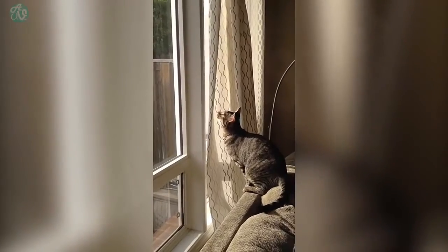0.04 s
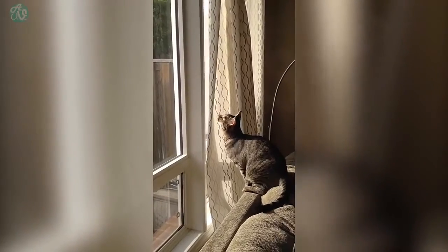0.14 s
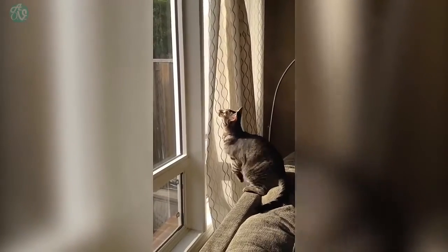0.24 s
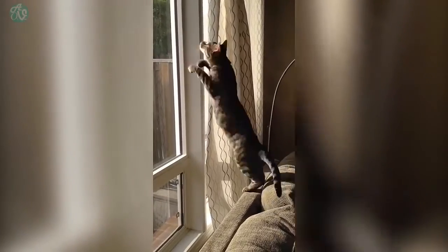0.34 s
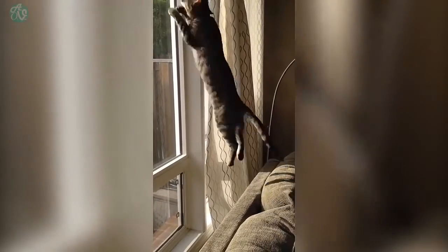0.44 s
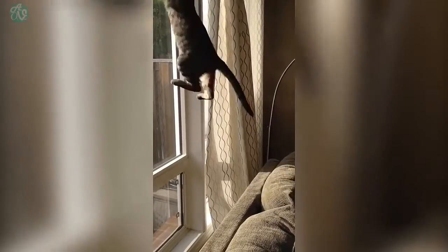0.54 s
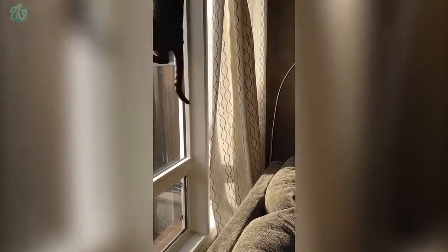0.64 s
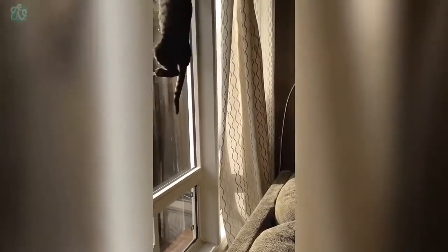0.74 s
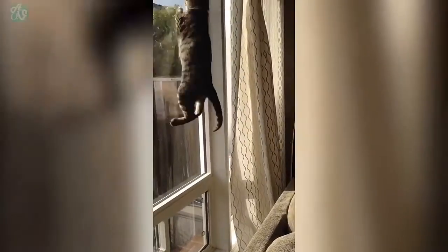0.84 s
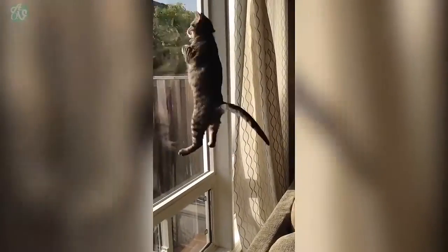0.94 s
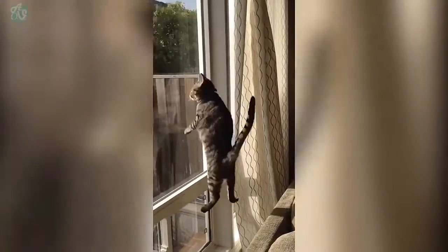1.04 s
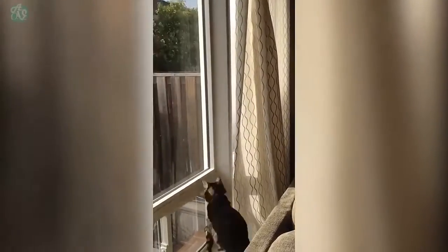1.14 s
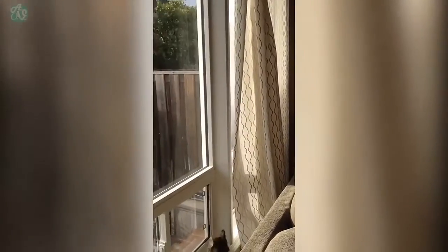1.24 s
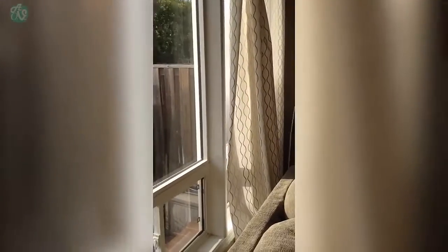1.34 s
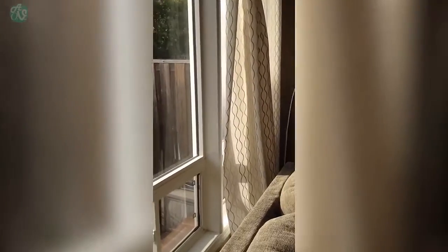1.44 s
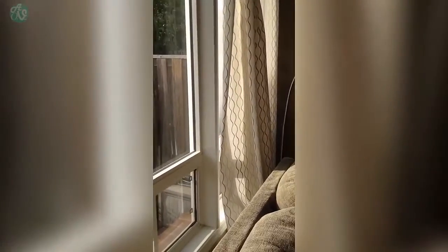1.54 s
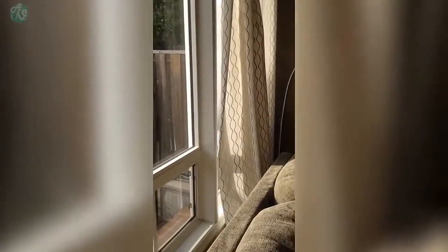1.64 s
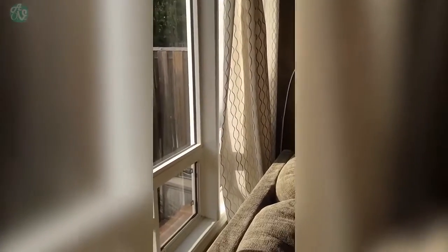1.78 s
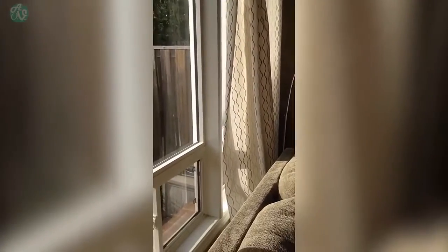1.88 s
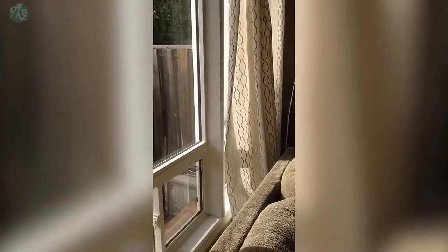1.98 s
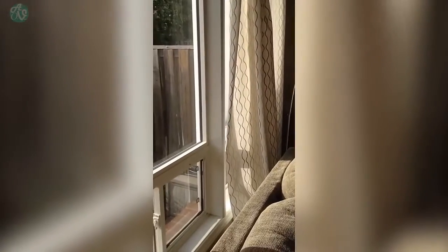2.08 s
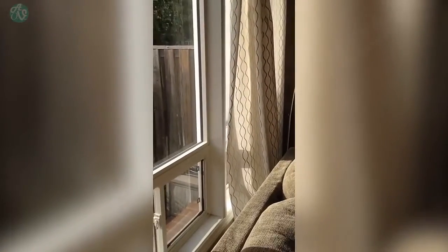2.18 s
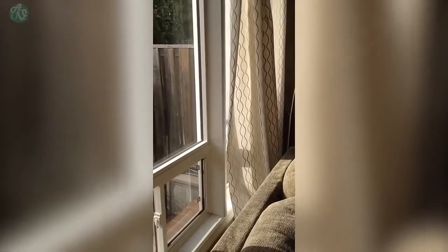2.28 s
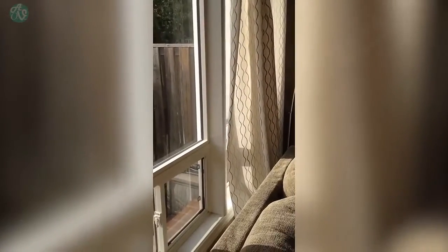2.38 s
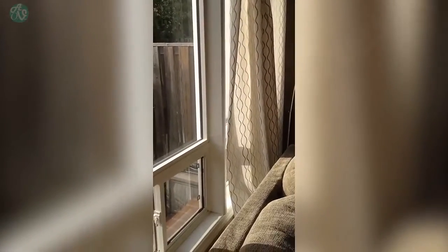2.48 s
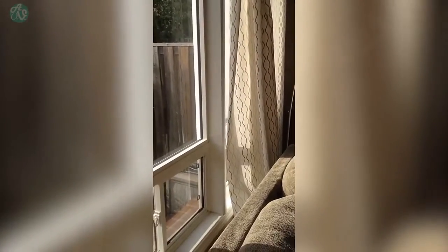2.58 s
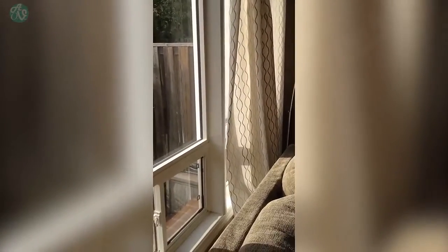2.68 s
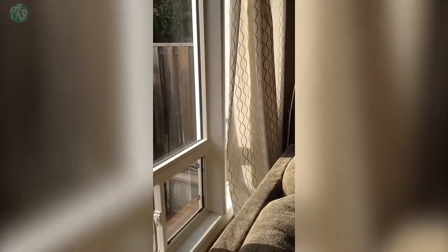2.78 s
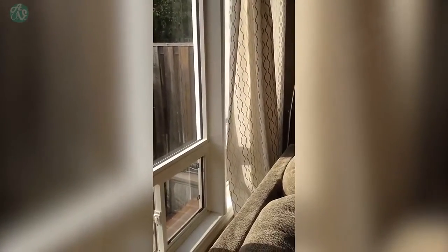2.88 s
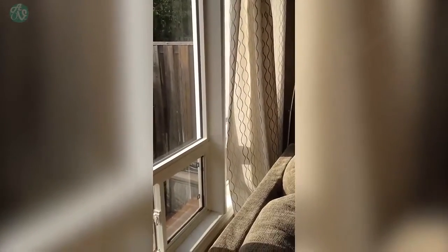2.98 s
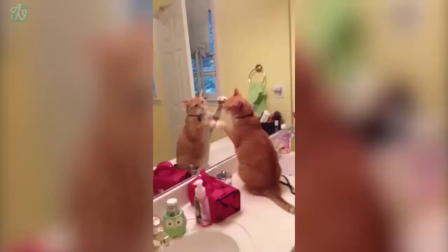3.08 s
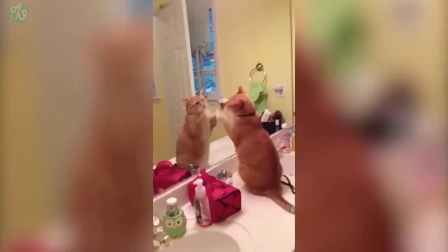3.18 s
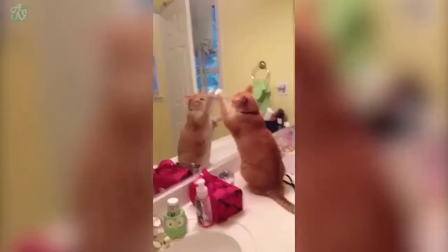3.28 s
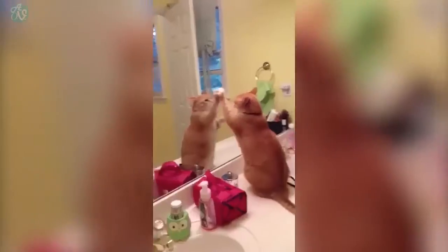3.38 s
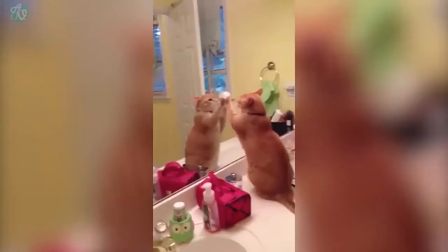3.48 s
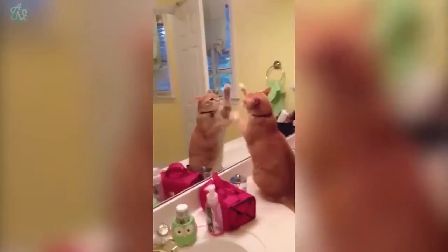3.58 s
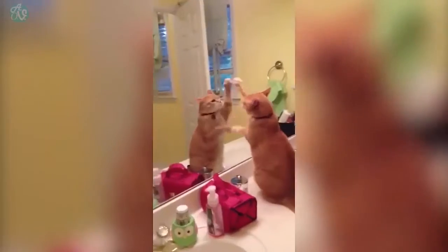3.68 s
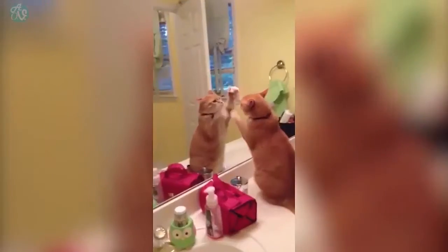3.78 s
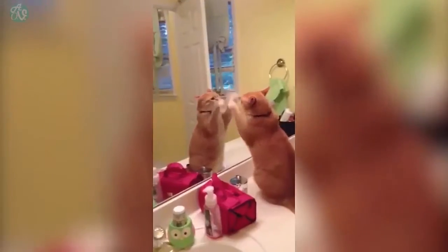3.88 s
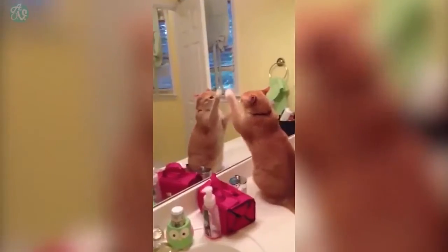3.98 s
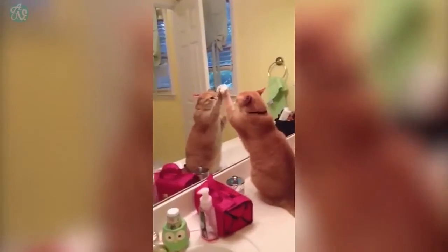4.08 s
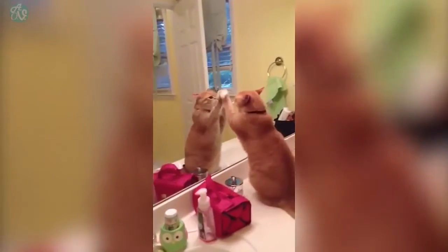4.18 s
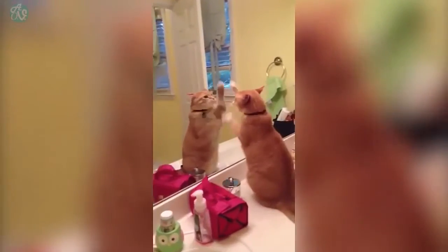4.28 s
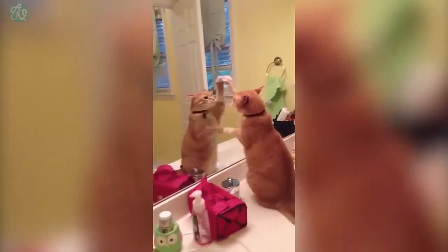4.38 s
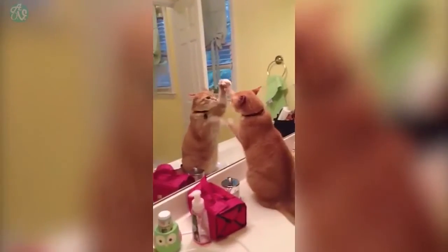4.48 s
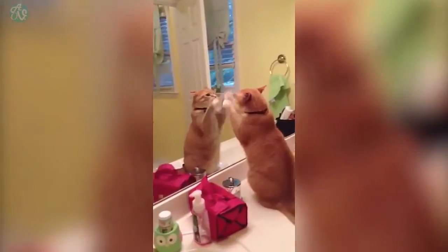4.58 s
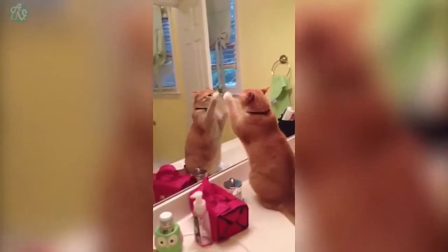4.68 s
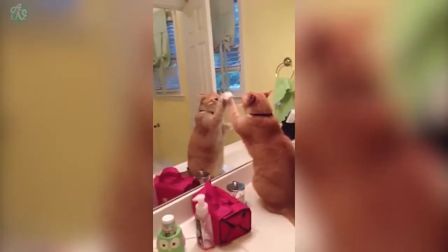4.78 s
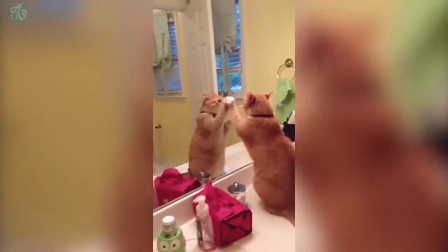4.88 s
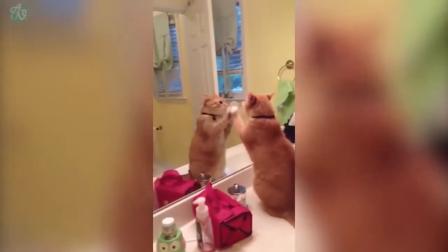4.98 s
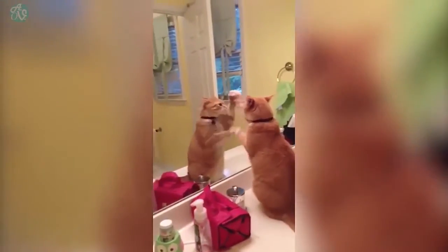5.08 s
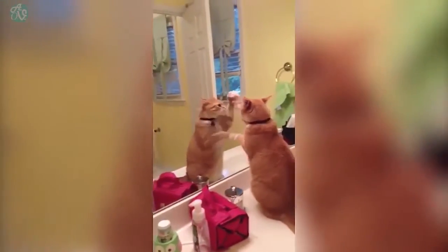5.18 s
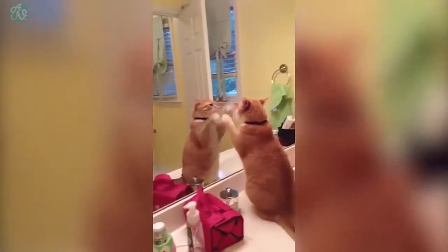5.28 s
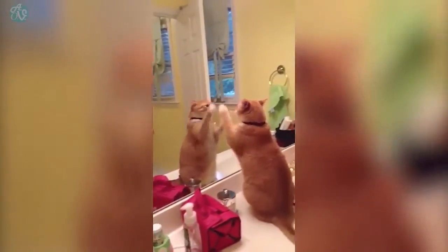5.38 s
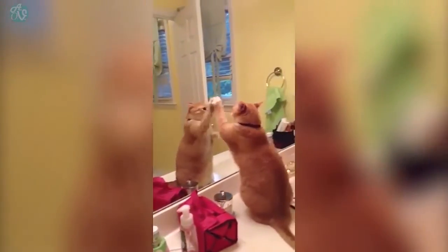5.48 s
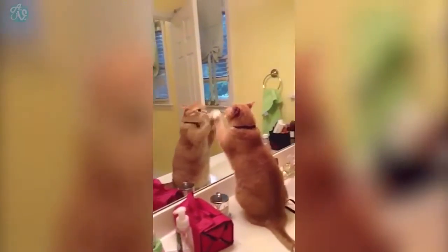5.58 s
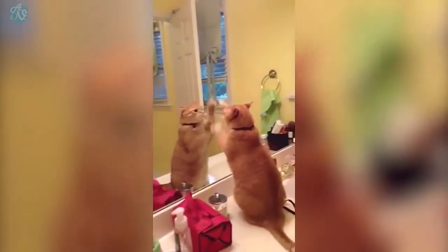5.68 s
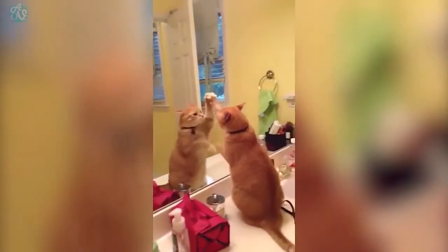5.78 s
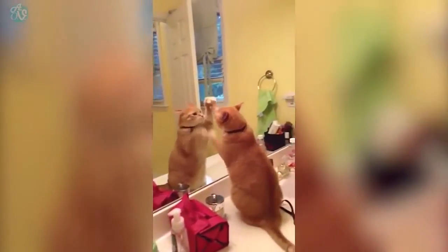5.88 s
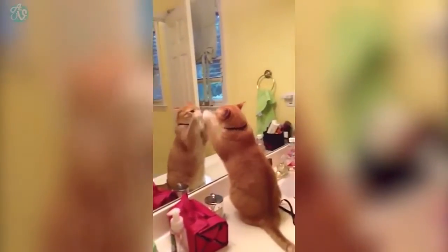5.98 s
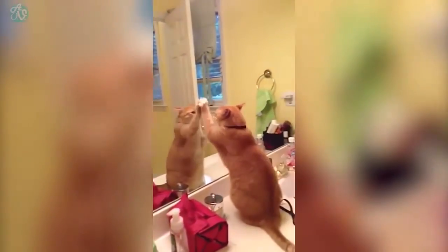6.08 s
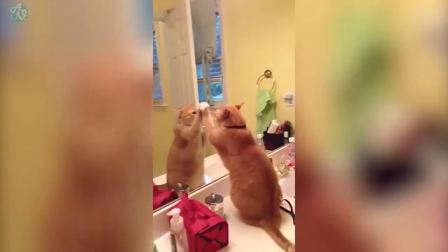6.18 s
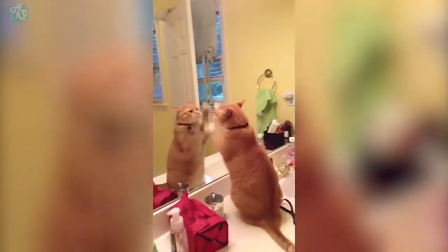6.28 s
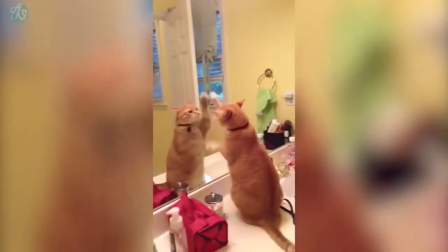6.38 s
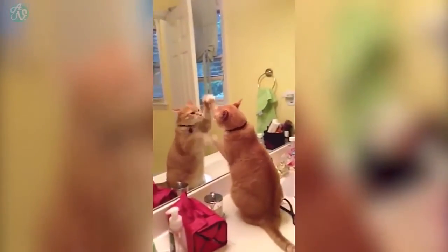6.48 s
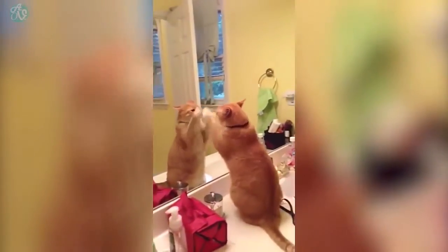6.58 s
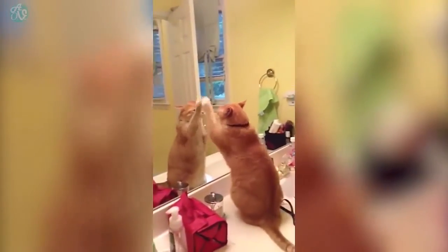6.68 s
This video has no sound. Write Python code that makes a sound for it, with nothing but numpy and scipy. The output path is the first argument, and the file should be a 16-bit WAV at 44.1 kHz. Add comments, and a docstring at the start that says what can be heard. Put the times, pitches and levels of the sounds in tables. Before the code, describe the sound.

A cat's collar bell jingles as it bangs a window and thuds down; after a click, paws slap a bathroom mirror about three times a second.

```python
"""Bell jingles, window bangs, claw scrapes and two thuds: a cat leaps at a living-room window and lands.
After a short break of two soft clicks, a pop and thin hiss, a cat in a small bathroom paws at a mirror
about three times a second: slaps, judders, swishes and one hollow bump. Hits are damped sine modes plus
coloured noise dying at the room's rate; judders are trains of soft pushes; fur and air are shaped noise.
"""
import sys
import numpy as np
from scipy import signal
from scipy.fft import rfft, irfft, next_fast_len
from scipy.io import wavfile
from scipy.ndimage import uniform_filter1d

SR = 44100
rng = np.random.default_rng(int(sys.argv[2]) if len(sys.argv) > 2 else 0)


def store_pcm(level_fs):
    """Save levels as 16-bit WAV."""
    pcm = np.round(np.clip(level_fs, -1, 1) * 32767).astype(np.int16)
    wavfile.write(sys.argv[1], SR, np.atleast_2d(pcm).T)


N = 297234
TIME_S = np.arange(N) / SR
AGE_S = TIME_S[:SR * 3 // 4]  # time since a contact

# Event levels are nominal: each layer adds its own trim. Spectra and modes are relative, rescaled to rms 1.

# Air of the living room. Each row: frequency in Hz, density in dB per Hz.
LOUNGE_AIR = [(24, -91), (40, -62), (91, -34), (166, -11), (202, -22), (218, -13), (241, -4), (325, -21.5),
              (350, -15.5), (377, -23.5), (417, -23), (817, -31), (926, -26), (1050, -33.5), (15500, -57)]
# A distant fan. Each row: centre in Hz, width in Hz, level in dB.
FAN_HUM = [(240.4, 5.3, -59), (173, 16, -73), (942, 120, -74)]
# Decay of the living room. Each row: frequency in Hz, t60 in seconds.
LOUNGE_T60 = [(200, 0.56), (1000, 0.48), (4000, 0.56), (12000, 0.56)]

# Jolts of the bell's pellet. Each row: start in seconds, level in dB, thinnest ring relative to it in dB.
JINGLES = [(0.7103, -60, -8), (0.8056, -40.5, -16), (0.8395, -35, -11), (0.9344, -44, -18),
           (0.967, -43, -8), (1.0675, -30, -13), (1.2989, -58, -3), (1.3758, -50, -6), (1.4416, -38.5, -6),
           (1.502, -35.5, -5), (1.575, -38, -12), (1.601, -44, 6), (1.6324, -47, -1), (1.9101, -56, -19),
           (1.9815, -48, -21)]
# The bell's lowest, middle and thinnest partials. Each row: frequency in Hz, level in dB, t60 in seconds.
BELL_LOW = [(6386, 3, 0.43), (6310, 4, 0.2), (6500, -1, .25)]
BELL_MIDDLE = [(8400, -13, .3), (8940, -2.5, 0.13), (8850, -15, 0.28), (12350, -14, 0.16), (12330, 3, 0.15),
               (12700, 12, 0.14), (12840, 2, 0.094), (12800, -10, .24), (13050, -8, .16)]
BELL_HIGH = [(10810, -13, 0.21), (11000, -7, 0.13), (14500, -4, .21), (15100, -3, 0.086), (14980, -6, .14)]
# Dense response of the bell's shell. Each row: frequency in Hz, density in dB per Hz.
BELL_SHELL = [(4000, -20.5), (5000, -18.0), (7500, -17.5), (8900, -13.5), (10000, -21),
              (11800, -13), (12750, -0.5), (13700, -25), (14800, -16), (15600, -25)]

# Paws and body hitting the window. Each row: start in seconds, boom in dB, knock in dB.
WINDOW_BUMPS = [(0.784, -32, -24), (0.84, -25, -25), (0.867, -25.5, -34), (0.914, -27.5, -34.5),
                (0.936, -29.5, -31.5), (0.963, -34, -44)]
# Claws catching and scraping. Each row: start in seconds, level in dB.
CLAWS = [(0.7837, -39), (0.839, -27.5), (0.8664, -44.5), (0.9987, -50.5), (1.0867, -35), (1.478, -33),
         (1.496, -29)]
# The window in its frame. Each row: frequency in Hz, level in dB, t60 in seconds.
WINDOW_FRAME = [(165.5, -5, 0.23), (227.6, -0.5, 0.43), (315, 8.5, 0.43), (402, -1, 0.48),
                (444, -4.5, 0.24), (509, -6, 0.51), (578, -6.5, 0.36), (739, -9, 0.18), (797, -16, 0.21)]
# Boom, knock, fur scuff and claw scrape. Each row: frequency in Hz, density in dB per Hz.
BOOM = [(53, -63), (90, -34), (119, -18.5), (226, 0.5), (270, -2), (339, -4.5), (415, -16), (450, -23),
        (580, -51.5), (990, -120)]
KNOCK = [(220, -21), (380, -3.5), (448, -2.5), (542, -17.5), (746, -6), (835, -11.5), (875, -15),
         (1300, -23.5), (1690, -41.5), (2860, -120)]
SCUFF = [(710, -36), (1200, 1.5), (1430, -1.5), (1980, -3.5), (2140, -4.5), (3060, -8.5), (4580, -10),
         (7780, -23), (12000, -22), (15600, -45), (22000, -120)]
SCRAPE = [(880, -28), (1500, -2.5), (2120, -15), (4410, 0.5), (5200, -5), (6610, -0.5), (11500, -16.5),
          (12600, -14), (15000, -23)]

# Paws landing. Each row: start in seconds, boom in dB, knock in dB, scuff in dB, lead-in in seconds.
LANDINGS = [(1.435, -15, -23.5, -32, 0.0038), (1.5, -13, -15.5, -22.5, 0.028)]
# Floorboards. Each row: frequency in Hz, level in dB, t60 in seconds.
FLOOR = [(179.3, -12.5, 0.38), (229, 2.5, 0.18), (334.6, -10.5, 0.31), (374.5, 1, 0.082), (438, -13, 0.19),
         (535, -16, 0.36), (677, -11, 0.15), (982, -18.5, 0.11)]
# Knock of a landing. Each row: frequency in Hz, density in dB per Hz.
THUD = [(250, -24), (420, -5), (471, -1), (594, -7.5), (663, 0.5), (780, -9.5), (871, -8.5), (1200, -17.5),
        (1560, -50), (2640, -120)]

# Two soft, short clicks in the break. Each row: start in seconds, end in seconds, level in dB.
CLICKS = [(3.209, 3.233, -50.5), (3.276, 3.289, -53.5)]
# A dull pop in the break. One row: start in seconds, end in seconds, level in dB.
POP = (3.231, 3.242, -45)
# The clicks, then a thin hiss with a faint 2.2 kHz whistle. Each row: frequency in Hz, density in dB per Hz.
CLICK = [(88, -36), (150, 2.5), (312, -23), (485, 1.5), (1240, -18), (1690, -7), (2620, -21.5), (4800, -10),
         (7050, -33), (12000, -38), (15600, -71), (22000, -120)]
BREAK_HISS = [(300, -6), (1900, -9), (2120, -4), (2190, 16), (2260, -6), (4000, -8), (6000, -16),
              (15000, -24)]

# Air of the bathroom. Each row: frequency in Hz, density in dB per Hz.
BATH_AIR = [(24, -54), (40, -40), (101, -16), (166, 2), (253, -2.5), (325, 0), (496, -12.5), (740, -9.5),
            (903, -12), (1160, -12), (1310, -12), (10900, -21), (15500, -26)]
# Decay of the bathroom. Each row: frequency in Hz, t60 in seconds.
BATHROOM_T60 = [(300, 0.43), (1000, 0.24), (2500, 0.19), (6000, 0.19), (13000, 0.16)]

# Paws slapping the mirror. Each row: start in seconds, slap in dB, weight behind it in dB,
# snap of a flat landing in dB, slap centre in Hz.
TAPS = [(3.565, -34, -62, -40, 2400), (3.927, -22.5, -30.5, -32, 1860), (4.238, -29, -37.5, -30, 2730),
        (4.587, -29.5, -36, -24, 2070), (4.952, -26.5, -41, -25.5, 2205), (5.296, -30, -39.5, -38, 2300),
        (5.666, -22.5, -35.5, -30.5, 2315), (5.959, -30.5, -47.5, -45, 1890),
        (6.287, -25.5, -39.5, -28, 2420), (6.622, -25, -41, -28, 2050)]
# Pad's slap, snap, claw tick and glass knock. Each row: frequency in Hz, density in dB per Hz.
SLAP = [(710, -31), (1200, -7), (1370, -3.5), (1890, -1.5), (2020, -0.5), (2210, 1), (2710, -3), (3060, -4),
        (3850, -1), (5500, -32), (7150, -51), (12100, -120)]
SNAP = [(2000, -52), (3200, 4), (3800, 4), (4700, 5.0), (5300, -12.5), (6200, -40)]
TICK = [(2820, -7), (4800, -1.5), (5370, 2), (5990, -7), (7210, -6.5), (10300, -11.5), (14900, -19),
        (15500, -17)]
GLASS_KNOCK = [(200, -21), (340, -2), (378, -8.5), (500, 3), (556, -11), (660, 10), (756, 2), (817, 8.5),
               (882, 2), (1400, 0.5), (1820, -50), (3080, -120)]
# Glass damped by its mounting, then the mirror flexing. Each row: frequency in Hz, level in dB, t60 in seconds.
PANE = [(690, -7.5, 0.44), (755, 2.5, 0.18), (1122, -1.5, 0.26), (1573, -1.5, 0.17), (2035, 13, 0.13),
        (2120, 11.5, 0.11), (2400, 8, 0.15), (2700, 0, 0.12), (3050, 11, 0.14), (3296, 11, 0.12),
        (3540, -16, .15), (3950, 3, 0.14), (4280, 5.5, 0.16), (4860, -6, 0.15), (7100, -11.5, 0.099)]
PANEL = [(148.6, -1.5, .16), (184.7, -6.5, 0.3), (216.1, 4, 0.19), (249, -6.5, 0.18), (320, -14.5, 0.19)]

# Pads sticking and slipping. Each row: start in seconds, end in seconds, level in dB, panel pitch in Hz.
SLIDES = [(3.658, 3.942, -44, 206.5), (4.135, 4.26, -43, 200), (4.76, 4.898, -56, 206),
          (5.3, 5.454, -44, 184.4), (5.51, 5.678, -43.5, 177), (5.855, 6.0, -47, 176),
          (6.16, 6.275, -54, 193), (6.38, 6.6, -52.5, 185)]
# Soft drag of a sliding pad. Each row: frequency in Hz, density in dB per Hz.
PAD_DRAG = [(70, -55), (140, -1.0), (210, 3), (270, -15), (420, -43.0), (900, -56)]

# Strokes of fur. Each row: fastest moment in seconds, level in dB, rise in seconds, fall in seconds.
STROKES = [(3.835, -49, .1, .035), (4.1, -47.5, 0.034, 0.089), (4.495, -42.5, .065, 0.048),
           (4.81, -48, 0.11, 0.22), (5.255, -49, .038, .06), (5.6, -49, 0.12, 0.11),
           (5.865, -42.5, .045, 0.055), (6.181, -46.5, 0.069, .11), (6.511, -42.5, 0.083, 0.049)]
# One longer, brighter rub of fur. One row: start in seconds, end in seconds, level in dB.
BRUSH = (5.62, 5.81, -55.5)
# Fur hiss, plain and bright. Each row: frequency in Hz, density in dB per Hz.
FUR = [(320, -49), (550, -12.5), (658, -2.5), (953, -7.5), (1040, 1), (1220, -8), (1270, -3.5), (1980, -8),
       (2490, -8), (6000, -32.5), (7800, -62), (13200, -120)]
BRIGHT_FUR = [(1000, -30), (2500, -7.0), (3700, -3.5), (5000, -3), (5800, -15), (9000, -19), (15000, -26)]

# One dull, hollow bump. Each row: frequency in Hz, level in dB, t60 in seconds.
HOLLOW = [(202, -7.5, 0.18), (288, -5, 0.17), (306.3, 5, 0.074), (351, -15, 0.12)]

LOUNGE_DB, BREAK_DB, BATH_DB = -57, -78, -57.5
LOW_RING_DB, LOW_RING_GROWTH = -36, 0.55  # at a 0 dB jolt; dB gained per dB of jolt
SCUFF_DB = -23  # re nominal knock
TICK_DB, TICK_FROM_SNAP = -6.5, 0.39  # re nominal slap; share of snap-minus-slap added
CLAW_HZ, CLAW_SPREAD_OCTAVES = 7490, 0.14  # tick resonance and its spread from tap to tap
STROKE_SHAPE = 1.41  # 1 = pointed swell, 2 = rounded
SLOW_HZ, FAST_HZ = 1450, 2040  # hiss centre, paw nearly still and at full speed
BRUSH_FADE_S, LIFT_S = 0.11, 0.05  # LIFT_S: a stroke dies this quickly once the next slap lands
HOLLOW_S, HOLLOW_DB = 4.4865, -21.5
TOP_HZ = 15500


def amp(db):
    """Decibels to gain."""
    return 10 ** (np.asarray(db) / 20)


def unit(x):
    """Scale to rms 1."""
    return x / np.sqrt(np.mean(x ** 2) + 1e-20)


def struck(x):
    """Scale a hit to rms 1 over its first 25 ms."""
    return x / np.sqrt(np.mean(x[:SR // 40] ** 2) + 1e-20)


def along(points, hz):
    """Read (Hz, value) points on a log-frequency axis."""
    f, v = np.transpose(points)
    return np.interp(np.log(hz + 1), np.log(f + 1), v)


def filtered(x, response):
    """Multiply the spectrum of x by a response of frequency."""
    size = next_fast_len(len(x) + 8192)
    spectrum = rfft(x, size) * response(np.fft.rfftfreq(size, 1 / SR))
    return irfft(spectrum, size)[:len(x)]


def noise(spectrum, size):
    """Coloured noise of rms 1."""
    return unit(filtered(rng.standard_normal(size), lambda hz: amp(along(spectrum, hz))))


def gate(start_s, end_s, fade_s):
    """1 between two times, with sloping edges outside them."""
    return np.clip(1 + np.minimum(TIME_S - start_s, end_s - TIME_S) / fade_s, 0, 1)


def add(track, s, sound):
    """Mix a sound into the track at time s."""
    part = track[round(s * SR):][:len(sound)]
    part += sound[:len(part)]


def burst(spectrum, room_t60, direct_db, direct_t60_s, attack_s):
    """Dense contact noise: a room tail dying band by band, plus a direct part that dies faster still."""
    hz, t, z = signal.stft(noise(spectrum, len(AGE_S)), SR, nperseg=256)
    # near walls comb the treble differently for each contact
    comb_db = 3 * unit(uniform_filter1d(rng.standard_normal(len(hz)), 2)) * np.clip(hz / 2500, 0, 1)
    decay_db = -60 * t / along(room_t60, hz)[:, None]
    tail = signal.istft(z * amp(comb_db[:, None] + decay_db), SR, nperseg=256)[1][:len(AGE_S)]
    direct = amp(direct_db) * np.exp(-np.log(1000) * AGE_S / direct_t60_s)
    return struck(tail * (1 + direct) * (1 - np.exp(-AGE_S / attack_s)))


def ring(modes, attack_s, scatter_db, detune):
    """Damped sine modes, their strengths and pitches scattered at random for each blow."""
    hz, db, t60_s = np.transpose(modes)[:, :, None]
    level, pitch = rng.standard_normal((2, len(modes), 1))
    waves = amp(db + scatter_db * level) * np.sin(2 * np.pi * hz * (1 + detune * pitch) * AGE_S)
    decaying = np.sum(waves * np.exp(-np.log(1000) * AGE_S / t60_s), 0)
    return struck(decaying * (1 - np.exp(-AGE_S / attack_s)))


def living_room_air():
    """Steady coloured noise and a distant fan's hum: noise through narrow resonances."""
    air = amp(LOUNGE_DB) * noise(LOUNGE_AIR, N)
    for centre_hz, width_hz, db in FAN_HUM:
        hum = filtered(rng.standard_normal(N), lambda hz: 1 / (1 + (2 * (hz - centre_hz) / width_hz) ** 2))
        air += amp(db) * unit(hum)
    return air * gate(0, 3.165, fade_s=0.0025)


def collar_bell(bounces_hz=70, bounce_db=-8, rise_s=0.0019):
    """A loose pellet strikes a small slotted shell and bounces twice, ringing close pairs of partials."""
    out = np.zeros(N)
    for s, db, thin_db in JINGLES:
        low_db = LOW_RING_DB + LOW_RING_GROWTH * db
        add(out, s, amp(low_db) * ring(BELL_LOW, rise_s, scatter_db=10, detune=0.00034))
        add(out, s, amp(db - 9.5) * burst(BELL_SHELL, LOUNGE_T60, 18.5, direct_t60_s=0.04, attack_s=rise_s))
        delays_s = np.append(0, np.cumsum(rng.uniform(0.5, 1.5, size=2) / bounces_hz))
        for k, late_s in enumerate(delays_s):
            hit_db = db + k * bounce_db
            middle = ring(BELL_MIDDLE, rise_s / 2, scatter_db=10, detune=0.004)
            high = ring(BELL_HIGH, rise_s / 2, scatter_db=2, detune=0.004)
            add(out, s + late_s, amp(hit_db - 9.0) * middle)
            add(out, s + late_s, amp(hit_db + thin_db - 7.5) * high)
    return out


def leap():
    """Blows boom in the window frame; claws scrape during the blows, after them and around the landings."""
    out = np.zeros(N)
    for s, boom_db, knock_db in WINDOW_BUMPS:
        frame = ring(WINDOW_FRAME, attack_s=0.0016, scatter_db=4.0, detune=0.0147)
        boom = burst(BOOM, LOUNGE_T60, direct_db=-7, direct_t60_s=0.16, attack_s=0.0035)
        knock = burst(KNOCK, LOUNGE_T60, direct_db=-12.0, direct_t60_s=0.082, attack_s=0.002)
        scuff = burst(SCUFF, LOUNGE_T60, direct_db=10.0, direct_t60_s=0.04, attack_s=0.00053)
        add(out, s, amp(boom_db - 5.5) * frame)
        add(out, s, amp(boom_db - 9.5) * boom)
        add(out, s, amp(knock_db - 8.0) * knock)
        add(out, s, amp(knock_db + SCUFF_DB) * scuff)
    for s, scrape_db in CLAWS:
        scrape = burst(SCRAPE, LOUNGE_T60, direct_db=13, direct_t60_s=0.051, attack_s=0.00073)
        add(out, s, amp(scrape_db - 7.0) * scrape)
    return out


def landing():
    """Pads brush the floor first; then the cat's weight drops on the boards, which boom."""
    out = np.zeros(N)
    for s, boom_db, knock_db, scuff_db, lead_s in LANDINGS:
        brush = noise(SCUFF, len(AGE_S)) * np.exp(-AGE_S[::-1] / lead_s)  # swells up to the impact
        boards = ring(FLOOR, attack_s=0.005, scatter_db=0, detune=0.0045)
        boom = burst(BOOM, LOUNGE_T60, direct_db=-0.5, direct_t60_s=0.087, attack_s=0.004)
        knock = burst(THUD, LOUNGE_T60, direct_db=8, direct_t60_s=0.076, attack_s=0.0029)
        scuff = burst(SCUFF, LOUNGE_T60, direct_db=11.5, direct_t60_s=0.073, attack_s=0.0022)
        add(out, s - AGE_S[-1], amp(scuff_db - 11.0) * brush)
        add(out, s, amp(boom_db - 2.5) * boards)
        add(out, s, amp(boom_db - 8.0) * boom)
        add(out, s, amp(knock_db - 5.5) * knock)
        add(out, s, amp(scuff_db - 5.5) * scuff)
    return out


def break_sounds():
    """Two short noise bursts heard as soft clicks, one flat pulse heard as a pop, and a thin hiss."""
    levels = sum(amp(db) * gate(start_s, end_s, fade_s=0.001) for start_s, end_s, db in CLICKS)
    clicks = noise(CLICK, N) * levels
    pop_start_s, pop_end_s, pop_db = POP
    pop = amp(pop_db) * gate(pop_start_s, pop_end_s, fade_s=0.00025)
    hiss = amp(BREAK_DB) * noise(BREAK_HISS, N) * gate(3.21, 3.315, fade_s=0.005)
    return clicks + pop + hiss


def bathroom_air():
    """A steady hiss of coloured noise under the bathroom."""
    return amp(BATH_DB) * noise(BATH_AIR, N) * gate(3.315, N / SR, fade_s=0.0016)


def paw_taps():
    """Claws tick, the pad slaps, the glass rings briefly and the whole panel flexes a moment later."""
    out = np.zeros(N)
    for s, slap_db, weight_db, snap_db, centre_hz in TAPS:
        # the pad's shape as it lands favours one part of the slap's range
        pad = [(hz, db - 5 * np.log2(hz / centre_hz) ** 2) for hz, db in SLAP]
        slap = burst(pad, BATHROOM_T60, direct_db=-14, direct_t60_s=0.021, attack_s=0.00049)
        add(out, s, amp(slap_db - 5.5) * slap)
        # a flat, fast landing adds a brighter snap
        snap = burst(SNAP, BATHROOM_T60, direct_db=-5, direct_t60_s=0.02, attack_s=0.0003)
        add(out, s, amp(snap_db - 12.5) * snap)
        # each spot rings the glass modes at different strengths
        glass = ring(PANE + [(centre_hz, 6, 0.14)], attack_s=0.001, scatter_db=3, detune=0.008)
        add(out, s, amp(slap_db - 10.5) * glass)
        # the claw's tick has one narrow resonance
        tick_db = slap_db + TICK_DB + TICK_FROM_SNAP * (snap_db - slap_db)
        claw_hz = CLAW_HZ * 2 ** (CLAW_SPREAD_OCTAVES * rng.standard_normal())
        resonance = [(claw_hz / 2, -80), (claw_hz, 0), (claw_hz * 1.5, -80)]
        claw = burst(resonance, BATHROOM_T60, direct_db=7, direct_t60_s=0.031, attack_s=0.00033)
        tick = burst(TICK, BATHROOM_T60, direct_db=-6, direct_t60_s=0.017, attack_s=0.00015)
        add(out, s, amp(tick_db - 15.5) * claw)
        add(out, s, amp(tick_db - 7.0) * tick)
        # the leg's weight knocks the glass and flexes the panel
        knock_spectrum = [(100, -60)] + list(GLASS_KNOCK)
        knock = burst(knock_spectrum, BATHROOM_T60, direct_db=-22, direct_t60_s=0.027, attack_s=0.0029)
        flex = ring(PANEL, attack_s=0.0097, scatter_db=4, detune=0.031)
        add(out, s, amp(weight_db - 6.0) * knock)
        add(out, s + 0.0039, amp(weight_db - 2.5) * flex)
    return out


def judder(slips_hz=29, swell_s=0.012):
    """A sliding pad sticks and slips; every slip gives the panel a short, soft push and stirs the glass."""
    out = np.zeros(N)
    push = (AGE_S / swell_s) ** 2 * np.exp(2 * (1 - AGE_S / swell_s))
    for start_s, end_s, db, panel_hz in SLIDES:
        chance = rng.standard_normal((16, 3))
        for s, (late, size, pitch) in zip(np.arange(start_s, end_s, 1 / slips_hz), chance):
            wave = np.sin(2 * np.pi * panel_hz * (1 + 0.1 * pitch) * AGE_S)
            strength = amp(db + 1.2 * size)
            stir = amp(-19.5) * ring(PANE[:2], attack_s=0.0097, scatter_db=0.5, detune=0.013)
            add(out, s + 0.00295 * late, strength * (amp(1.0) * push * wave + stir))
        # the pad also drags softly throughout
        out += amp(db - 7) * gate(start_s, end_s, fade_s=0.017) * noise(PAD_DRAG, N)
    return out


def swishes(focus_db=9, focus_octaves=0.28):
    """Fur brushes the glass between slaps; the hiss follows the paw's speed in level and pitch."""
    slaps_s = np.array(TAPS)[:, 0]
    speeds = []
    for s, _, rise_s, fall_s in STROKES:
        span_s = np.where(TIME_S < s, rise_s, fall_s)
        speed = np.exp(-np.abs((TIME_S - s) / span_s) ** STROKE_SHAPE)
        next_slap_s = slaps_s[slaps_s > s][0]
        speeds.append(speed * gate(0, next_slap_s, LIFT_S))
    speeds = np.array(speeds)
    level = amp([db for _, db, _, _ in STROKES]) @ speeds
    centre_hz = SLOW_HZ + (FAST_HZ - SLOW_HZ) * speeds.max(axis=0)

    hz, t, z = signal.stft(noise(FUR, N), SR, nperseg=1024)
    distance = np.log2((hz[:, None] + 1) / np.interp(t, TIME_S, centre_hz)) / focus_octaves
    # hairs catch unevenly, in short narrow patches
    patches = uniform_filter1d(rng.standard_normal(z.shape), size=5, axis=0)
    patches = unit(uniform_filter1d(patches, size=4, axis=1))
    shape_db = focus_db * np.exp(-distance ** 2) + 4.85 * patches
    hiss = unit(signal.istft(z * amp(shape_db), SR, nperseg=1024)[1][:N])

    start_s, end_s, brush_db = BRUSH
    rub = amp(brush_db) * gate(start_s, end_s, BRUSH_FADE_S) * noise(BRIGHT_FUR, N)
    return amp(-3) * level * hiss + rub


def hollow_bump():
    """Something soft bumps a hollow body by the mirror, once: low damped modes, low-passed."""
    out = np.zeros(N)
    add(out, HOLLOW_S, amp(HOLLOW_DB) * ring(HOLLOW, attack_s=0.012, scatter_db=0, detune=0))
    # the soft contact leaves no click
    return signal.sosfilt(signal.butter(4, 520, fs=SR, output="sos"), out)


def scene():
    """Both rooms, one after the other, in mono."""
    lounge = living_room_air() + collar_bell() + leap() + landing()
    bathroom = bathroom_air() + paw_taps() + judder() + swishes() + hollow_bump()
    return (lounge + break_sounds() + bathroom)[None]


def record(dry):
    """The small microphone sheds deep bass; a steep cut removes what lies above the band limit."""
    thin = signal.sosfilt(signal.butter(2, 65, "high", fs=SR, output="sos"), dry[0])
    return filtered(thin, lambda hz: 1 / np.sqrt(1 + (hz / TOP_HZ) ** 200))[None]


dry = scene()
out = record(dry)
store_pcm(out)
```